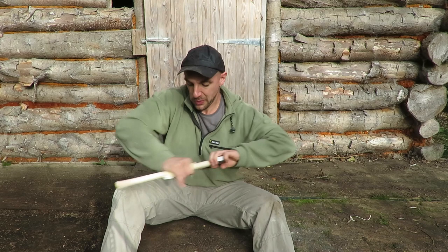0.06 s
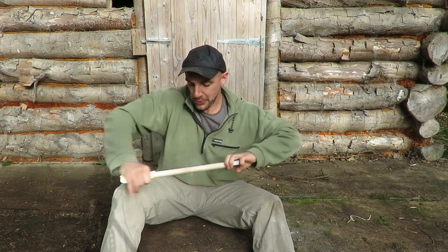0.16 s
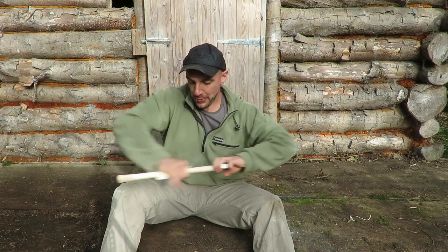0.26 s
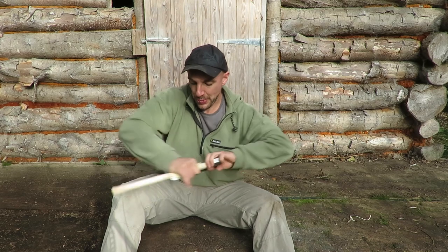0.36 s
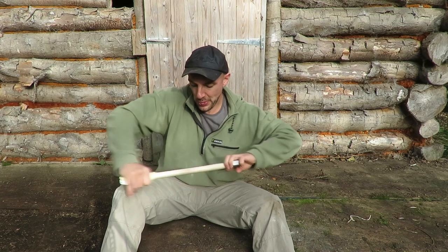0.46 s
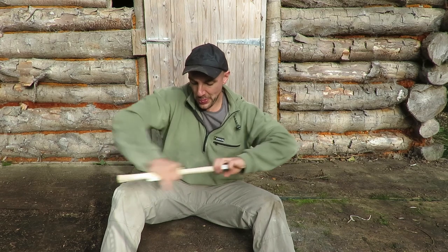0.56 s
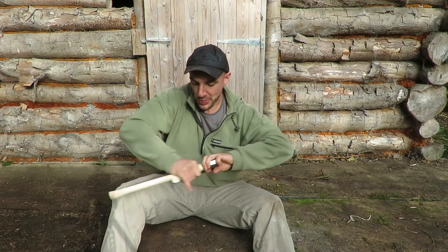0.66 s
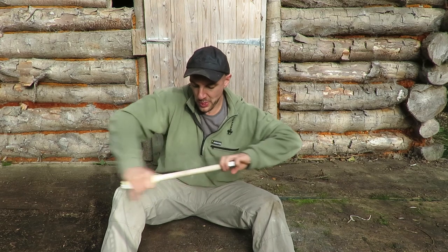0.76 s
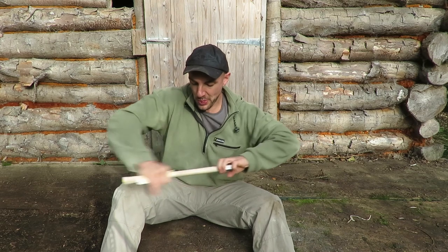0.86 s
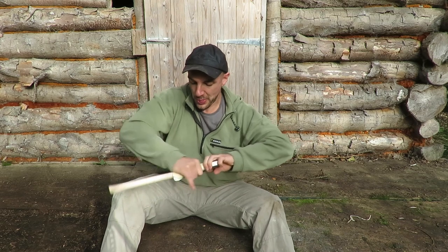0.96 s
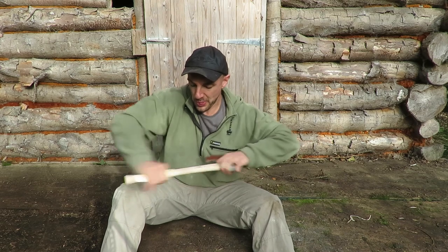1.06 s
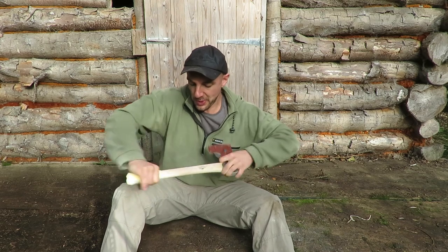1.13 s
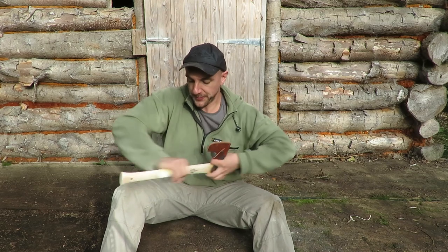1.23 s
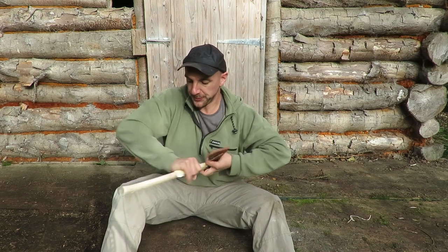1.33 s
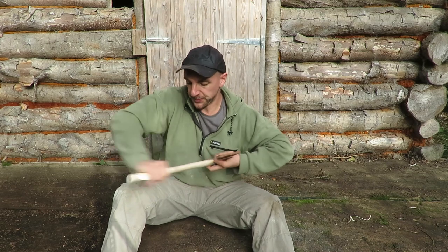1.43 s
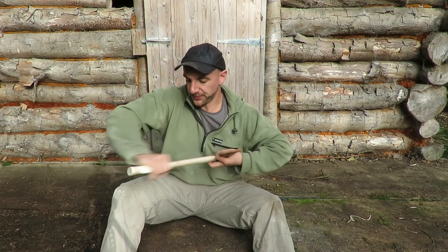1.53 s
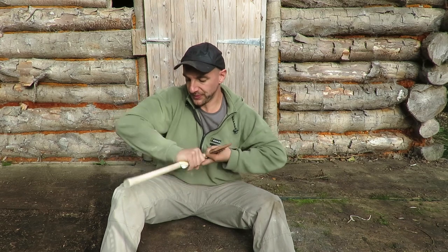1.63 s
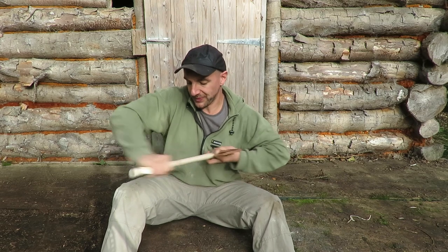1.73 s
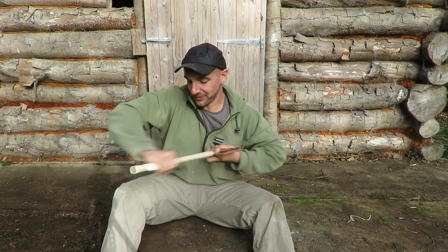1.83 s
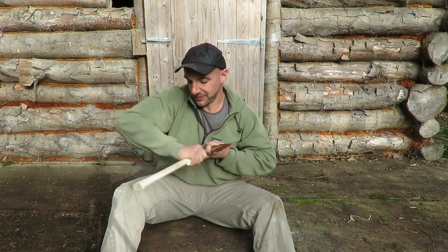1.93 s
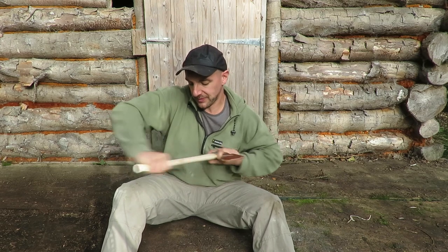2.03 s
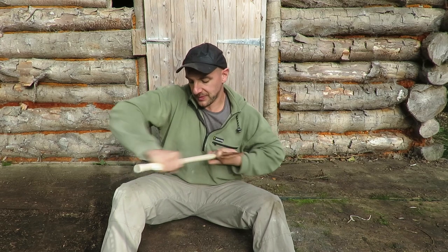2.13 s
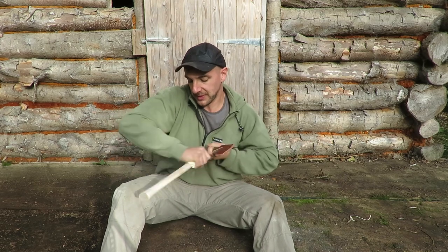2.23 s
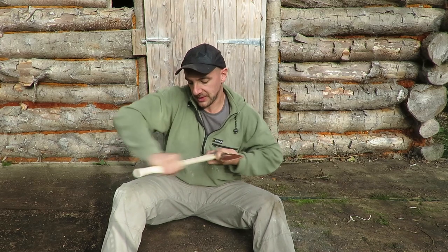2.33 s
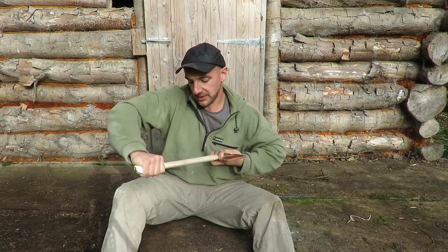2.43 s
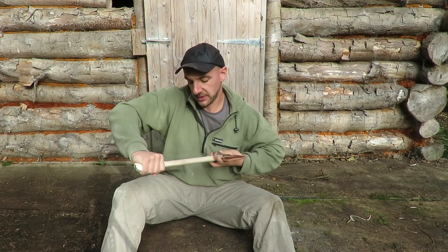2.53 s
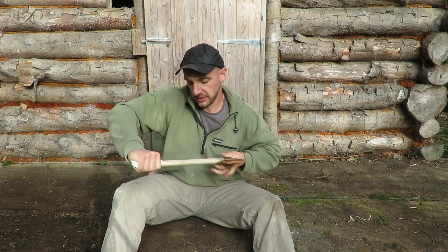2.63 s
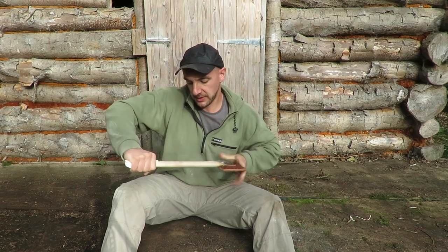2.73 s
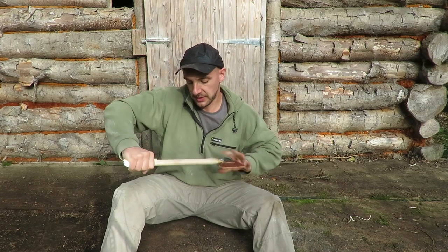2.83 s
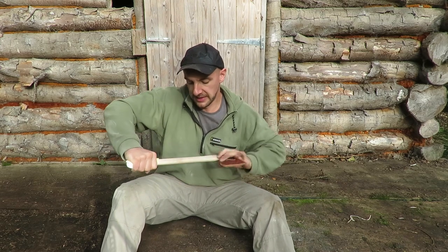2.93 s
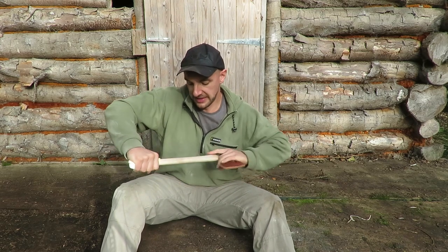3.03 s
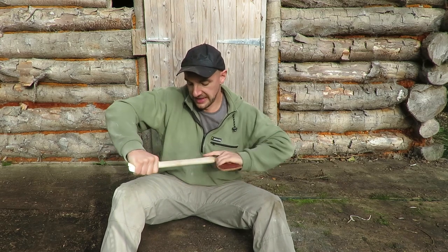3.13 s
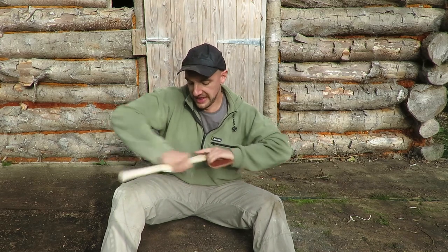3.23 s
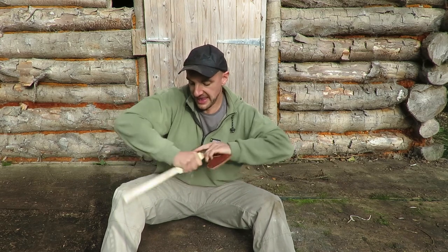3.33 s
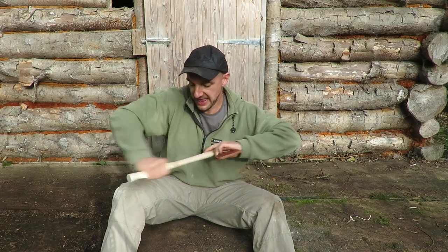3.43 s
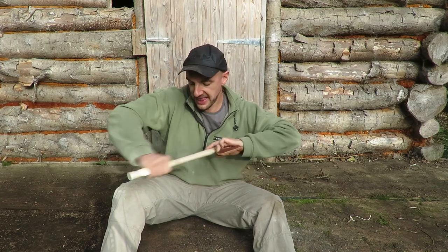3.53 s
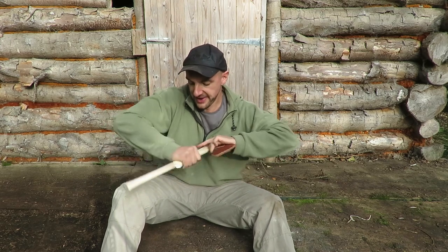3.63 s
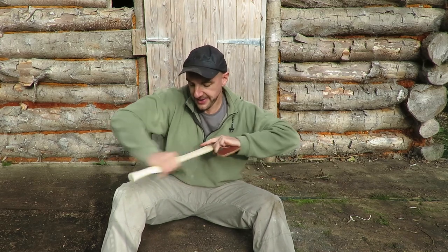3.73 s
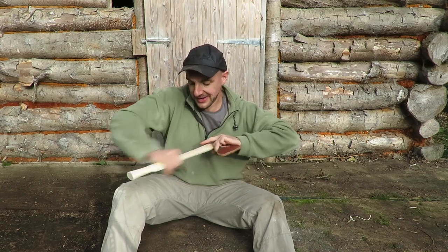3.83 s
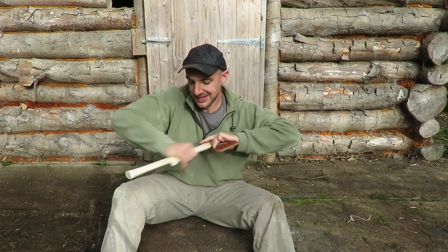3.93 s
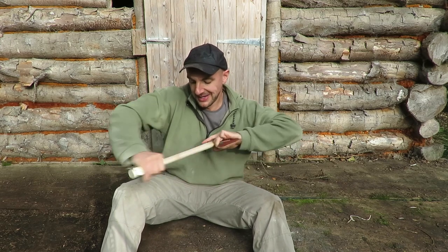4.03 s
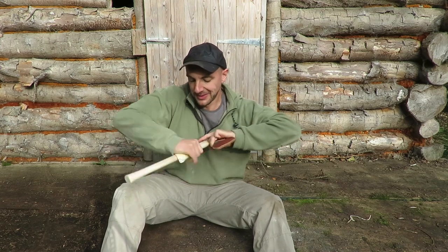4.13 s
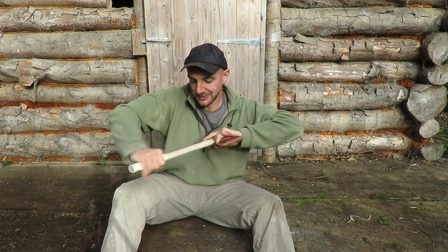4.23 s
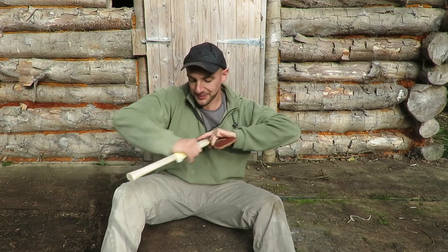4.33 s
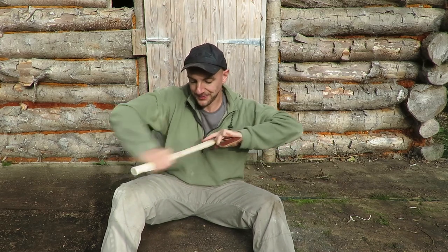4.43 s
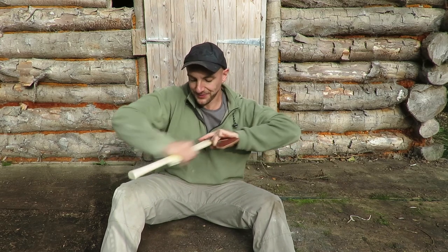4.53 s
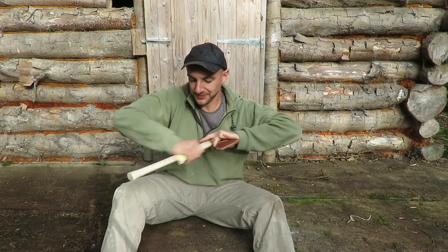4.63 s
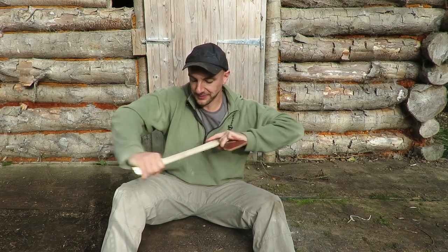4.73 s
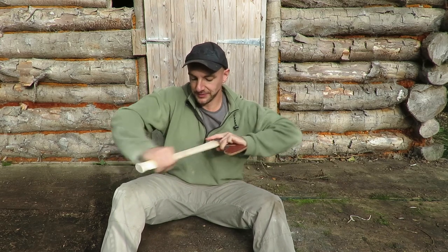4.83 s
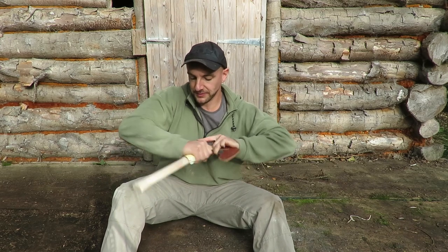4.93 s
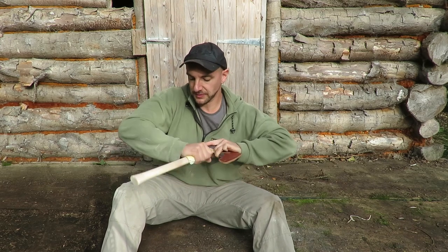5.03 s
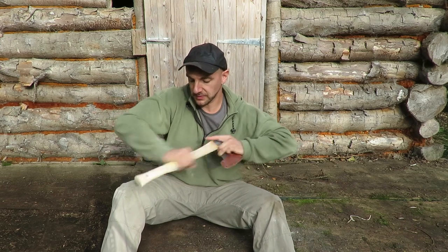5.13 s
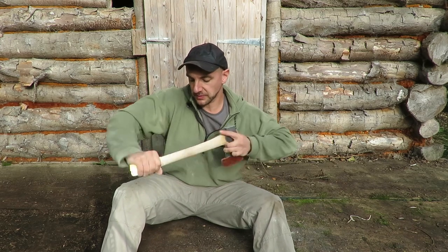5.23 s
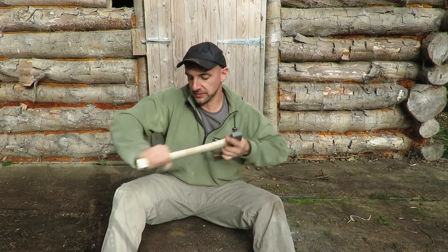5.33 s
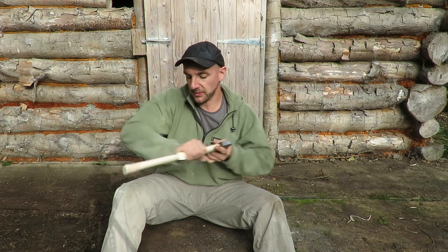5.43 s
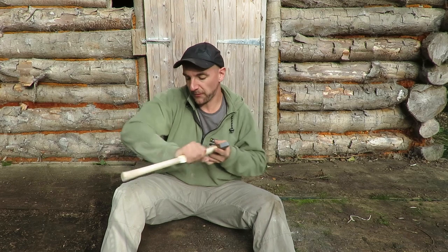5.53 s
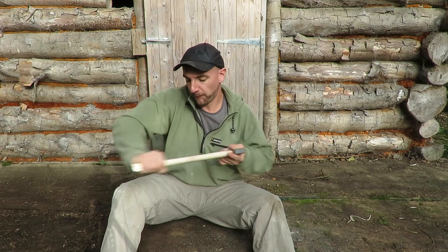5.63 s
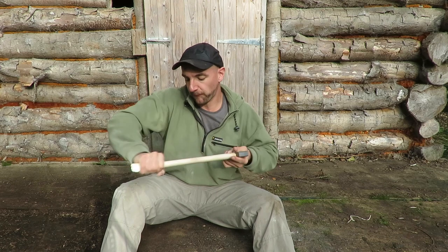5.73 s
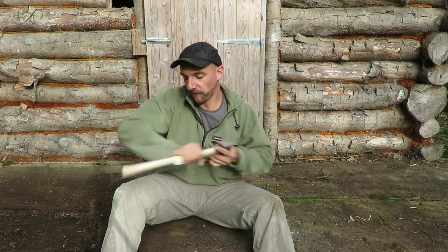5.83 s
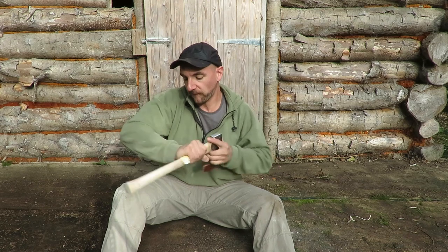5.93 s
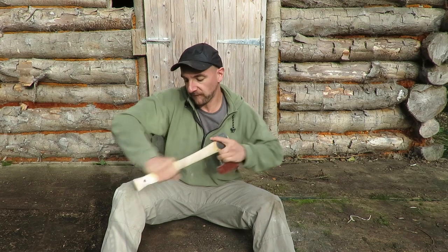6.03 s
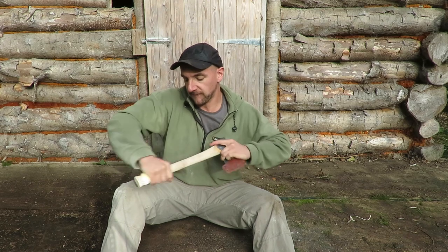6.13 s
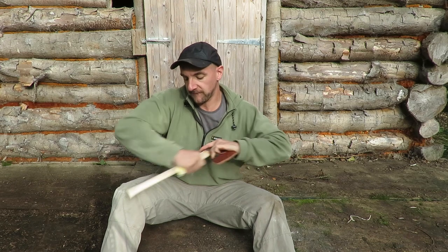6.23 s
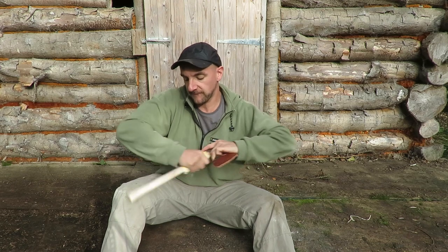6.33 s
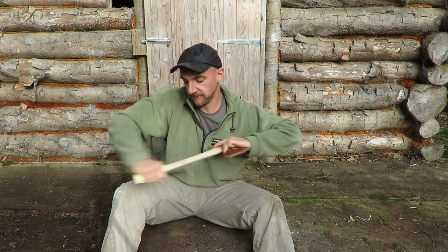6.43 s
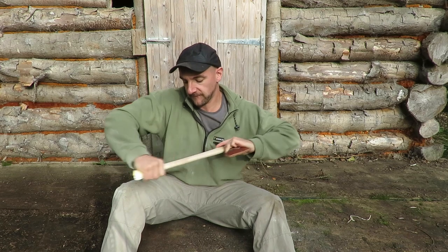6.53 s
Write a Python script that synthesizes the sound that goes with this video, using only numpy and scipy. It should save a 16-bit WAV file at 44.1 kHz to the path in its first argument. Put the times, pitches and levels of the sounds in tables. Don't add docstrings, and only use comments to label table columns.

```python
import sys
import numpy as np
from scipy import signal
from scipy.fft import rfft, irfft, next_fast_len
from scipy.io import wavfile
from scipy.ndimage import uniform_filter1d, map_coordinates

SR = 44100
rng = np.random.default_rng(int(sys.argv[2]) if len(sys.argv) > 2 else 0)


def ratio_of_db(decibels):
    return 10 ** (np.asarray(decibels, float) / 20)


def output_pcm(signal):
    pcm = np.clip(np.atleast_2d(signal).T, -1, 1) * 32767
    wavfile.write(sys.argv[1], SR, np.round(pcm).astype(np.int16))


N = 289825


def unit(x):
    return x / np.sqrt(np.mean(x ** 2) + 1e-20)


def along(points, hz):
    f, v = np.transpose(points)
    return np.interp(np.log(hz + 1), np.log(f + 1), v)


def wobble(rate):
    coarse = np.arange(0, N + 64, 64)
    knots = rng.standard_normal(int(N * rate / SR) + 4)
    return np.interp(np.arange(N), coarse, map_coordinates(knots, [coarse * rate / SR]))


def filtered(x, response):
    m = next_fast_len(N + 8192)
    return irfft(rfft(x, m) * response(np.fft.rfftfreq(m, 1 / SR)), m)[..., :N]


def coloured(x, spectrum):
    return filtered(x, lambda f: ratio_of_db(along(spectrum, f)))


def patchy(x, depth_db):
    z = signal.stft(x, nperseg=256)[2]
    field = uniform_filter1d(rng.standard_normal(z.shape), size=4, axis=0)
    field = uniform_filter1d(field, size=14, axis=1)
    return unit(signal.istft(z * ratio_of_db(depth_db * unit(field)), nperseg=256)[1][:N])


def grit(density, spread_db):
    hit = rng.random(N) < density
    return unit(hit * rng.standard_normal(N) * ratio_of_db(spread_db * rng.exponential(size=N)))


def rush():
    # frequency in Hz, level in dB per Hz.
    rush_spectrum = [(20, -20), (40, 5), (60, 4), (130, -4.5), (200, -5.5), (450, -9.5), (800, -7.5),
                     (1500, -12.5), (2200, -19.5), (4000, -23.5), (9000, -26.5), (15500, -32)]
    # frequency in Hz, side level in dB under the middle.
    side_width = [(60, -31), (200, -18), (400, -11.5), (1000, -19.5), (15000, -6.5)]
    # time in seconds, level in dB.
    traffic_swell = [(0, -47), (1.5, -50.5), (2.36, -45), (2.78, -50.5), (3.3, -45), (3.7, -47),
                     (4.1, -46.5), (4.65, -52), (5.29, -46), (5.67, -50.5), (6.57, -42)]
    s, db = np.transpose(traffic_swell)
    mid = patchy(coloured(rng.standard_normal(N), rush_spectrum), depth_db=1.45)
    side = unit(coloured(rng.standard_normal(N), rush_spectrum))
    side = coloured(side, side_width)
    swell_db = 0.67 * np.interp(np.arange(N) / SR, s, db - db.mean())
    return ratio_of_db(-40.5 + swell_db) * np.array([mid + side, mid - side])


def engine():
    # time in seconds, third order of the engine in Hz, level in dB.
    idle_speed = [
        (0.0, 54.2, -40),
        (0.07, 56.8, -40.5),
        (1.41, 58.9, -46),
        (2.36, 56.6, -44),
        (2.76, 58.5, -43.5),
        (4.76, 56.48, -43),
        (5.1, 58.6, -40),
        (5.29, 60.24, -44.5),
        (6.57, 59.9, -45),
    ]
    # multiple of the firing cycle, level in dB.
    orders = [(1, -43), (2, -13.5), (3, 2.5), (4, -8.5), (5, -13), (6, -22), (7, -6), (8, -16.5), (9, -15)]
    s, hz, db = np.transpose(idle_speed)
    t = np.arange(N) / SR
    turn = 2 * np.pi * np.cumsum(np.interp(t, s, hz) / 3) / SR
    tones = 0
    for k, level_db in orders:
        loudness = ratio_of_db(level_db + 2.1 * wobble(6.5))
        tones = tones + loudness * np.sin(k * turn + 1.22 * wobble(5))
    return np.sqrt(2) * ratio_of_db(np.interp(t, s, db) - 3.0) * tones


def wall(x):
    # frequency in Hz, time to fall 60 dB in seconds.
    decay_times = [(300, 0.16), (3000, 0.36), (12000, 0.32)]
    hz, t, z = signal.stft(rng.standard_normal(SR // 3), SR, nperseg=256)
    fade = ratio_of_db(-60 * t / along(decay_times, hz)[:, None])
    tail = signal.istft(z * fade, SR, nperseg=256)[1]
    return signal.oaconvolve(x, tail / np.linalg.norm(tail))[:N]


def rustle():
    # centre in seconds, spread in seconds, level in dB.
    shifts = [
        (2.62, .12, -63),
        (2.82, .06, -51),
        (3.08, .04, -46),
        (3.22, .07, -54),
        (4.89, 0.027, -41),
        (5.09, 0.0075, -43),
        (5.15, .025, -44.5),
        (6.398, 0.0092, -37),
    ]
    t = np.arange(N) / SR
    gain = sum(ratio_of_db(db) * np.exp(-((t - s) / spread) ** 2) for s, spread, db in shifts)
    spectrum = [(900, -6), (2500, -1.5), (9000, -10.0), (15500, -9)]  # (Hz, dB)
    crackle = coloured(grit(density=0.077, spread_db=-3.5), spectrum)
    return gain * ratio_of_db(2.0) * unit(crackle)


def knocks():
    # start in seconds, peak in dB, pitch in Hz, time to fall 60 dB in seconds.
    ticks = [(0.8295, -14, 5000, 0.0036), (1.289, -14, 3000, 0.0036), (2.3158, -12, 1920, 0.003),
             (2.7033, -31, 3140, 0.013), (2.7026, -41, 9500, 0.01), (2.8177, -35, 6700, 0.014),
             (2.8241, -35, 3800, .01), (3.0395, -36, 4300, .01), (2.8426, -42, 3400, .01),
             (3.04, -33.5, 2580, .025), (3.385, -17, 2230, .02), (4.3047, -7, 4970, 0.0094),
             (4.8351, -11, 2300, .012), (6.2699, -17, 5000, .004), (6.3432, -4, 4900, .008),
             (6.342, -10.5, 2020, 0.016)]
    # start in seconds, peak in dB, pitch in Hz, time to fall 60 dB and attack in seconds.
    bumps = [(1.2525, -6.5, 815, 0.0076, 0.00049), (1.2517, -16, 340, 0.012, .0005),
             (1.2543, -7, 1400, 0.016, .0005), (1.269, -18, 1700, 0.021, .001),
             (5.09, -27, 2300, 0.034, .005), (3.386, -22, 405, .08, .02), (3.405, -9.5, 352, 0.051, 0.028),
             (5.293, -18.5, 700, 0.014, .001), (5.305, -25.5, 433, 0.058, .008),
             (3.05, -40, 2500, .07, .006), (6.415, -18, 455, 0.015, .001)]
    out, t = np.zeros(N + SR), np.arange(SR // 8) / SR
    for s, db, hz, t60 in ticks:
        crack = 0.31 * rng.standard_normal(len(t))
        tick = ratio_of_db(db - 60 * t / t60) * (np.sin(2 * np.pi * hz * t) + crack)
        out[round(s * SR):][:len(t)] += tick
    for s, db, hz, t60, attack in bumps:
        onset = 1 - np.exp(-t / attack)
        out[round(s * SR):][:len(t)] += ratio_of_db(db - 60 * t / t60) * onset * np.sin(2 * np.pi * hz * t)
    return out[:N]


def strokes():
    # start and end in seconds, pressure at the start and at the end in dB,
    # wood ring over the hiss in dB.
    steady_bout = [(-0.028, 0.119, -24, -21.0, -13), (0.122, 0.278, -24.0, -19.5, -9.5),
                   (0.278, 0.441, -29, -21.0, -9.5), (0.44, 0.601, -25.5, -20.0, -7.5),
                   (0.597, 0.753, -25.5, -20.5, -8.5), (0.756, 0.911, -24.5, -19.5, -8),
                   (0.913, 1.073, -28, -22.0, -9.0), (1.072, 1.225, -27.5, -19.5, -7.5),
                   (1.234, 1.416, -18.5, -22, -8), (1.421, 1.592, -33.5, -20.5, -10),
                   (1.598, 1.748, -25.0, -21.5, -12), (1.753, 1.893, -24, -20.5, -11),
                   (1.888, 2.038, -27, -22.5, -11.5), (2.033, 2.183, -32.5, -19.0, -13.5),
                   (2.179, 2.335, -30, -22.0, -12), (2.327, 2.505, -33.5, -18.5, -14)]
    quick_bout = [(3.234, 3.409, -32.5, -21.0, -12), (3.418, 3.588, -30, -20, -11.5),
                  (3.593, 3.748, -28.5, -22.5, -12.5), (3.757, 3.899, -28, -19, -8.5),
                  (3.891, 4.013, -26.0, -19.5, -10.5), (4.017, 4.14, -26.5, -21.5, -10.5),
                  (4.133, 4.246, -25, -18.5, -10), (4.25, 4.365, -17.5, -23.0, -10.5),
                  (4.357, 4.471, -22.5, -22.5, -14.5), (4.467, 4.586, -28, -21.5, -10.0),
                  (4.58, 4.701, -22.5, -21, -11), (4.702, 4.869, -30.0, -20.5, -9.5),
                  (4.9, 5.068, -24.5, -21.5, -10.5)]
    slow_bout = [(5.16, 5.345, -30.5, -18.5, -6.5), (5.32, 5.579, -40.5, -22.0, -14),
                 (5.623, 5.781, -34, -17.5, -10), (5.826, 5.994, -26, -22.0, -13),
                 (6.001, 6.197, -35.5, -20, -5.5), (6.178, 6.394, -37.5, -23.0, -5.5),
                 (6.408, 6.582, -32, -19.5, -9)]
    return np.array([*steady_bout, *quick_bout, *slow_bout])


def per_stroke(values, places):
    start, end = strokes().T[:2, :, None]
    times = np.maximum.accumulate((start + (end - start) * np.array(places)).ravel())
    return np.interp(np.arange(N) / SR, times, values.ravel())


def direction():
    return (-1.) ** np.arange(len(strokes()))[:, None]


def sliding():
    speed_up_s, slow_down_s = 0.024, 0.021
    stick_s, break_free_s, creep = 0.01, 0.0027, 0.6
    build_curve, arch_db = 2.05, 4
    force = np.full(N, 1e-6)
    for start, end, first_db, last_db, _ in strokes():
        n = np.arange(max(int(start * SR) + 1, 0), min(int(end * SR), N))
        t = n / SR
        done = (t - start) / (end - start)
        speed = np.clip((t - start) / speed_up_s, 0, 1)
        speed *= np.clip((end - t) / slow_down_s, 0, 1) ** 1.34
        speed *= creep + (1 - creep) * np.clip((t - start - stick_s) / break_free_s, 0, 1)
        pressure_db = last_db + (first_db - last_db) * (1 - done) ** build_curve
        pressure_db += arch_db * 4 * done * (1 - done)
        force[n] += speed * ratio_of_db(pressure_db)
    return force


def grip():
    # time in seconds, favoured wood pitch in Hz, cupping in dB,
    # lowest modes left by the grip in dB.
    hand_path = [(0, 2150, 0, -9), (.6, 2220, -1, -4), (1.1, 1980, -1, -10), (1.3, 1860, 0.5, -4),
                 (1.65, 2350, 2, 6), (2.1, 2180, 0, 0), (2.4, 2000, -1.5, 1.5), (3.3, 1800, 1, -2),
                 (3.9, 2180, 0.5, 2), (4.3, 2280, 1, 4), (4.98, 2330, 0.5, -0.5), (5.2, 1500, 0, -3.5),
                 (5.33, 1470, 1.5, -5.5), (5.5, 1850, -3, -3), (5.9, 1550, -2, 2.5), (6.12, 1570, 2, -4.5),
                 (6.3, 1850, -1.5, 3.5), (6.57, 2000, -1.5, 4)]
    s, wood_hz, cup_db, free_db = np.transpose(hand_path)
    t = np.arange(N) / SR
    cupping_db = np.interp(t, s, cup_db) - 0.3 * per_stroke(direction(), [.5])
    return np.interp(t, s, wood_hz), cupping_db, np.interp(t, s, free_db)


def resonate(x, hz, width):
    b, a = signal.iirpeak(hz, hz / (1.46 * width), SR)
    return unit(signal.lfilter(b, a, signal.lfilter(b, a, x)))


def modes(rub, table, favoured_hz, narrow_db, swell_db, loose_db):
    ring, total = 0, 1e-9
    for hz, width, db in table:
        off_pitch_db = narrow_db * np.log(hz / favoured_hz) ** 2
        freed_db = loose_db * np.clip((1700 - hz) / 400, 0, 1)
        share = ratio_of_db(db + swell_db * wobble(14) - off_pitch_db + freed_db)
        ring = ring + share * resonate(rub, hz, width)
        total = total + share ** 2
    return ring / np.sqrt(total)


def grain_hiss(pace):
    # frequency in Hz, level in dB per Hz.
    grain_spectrum = [(500, -25.5), (1000, -16), (1450, -12.5), (1900, -7), (3200, -6), (3700, -4),
                      (4300, -3), (6300, -2.5), (8000, -2.5), (15500, -14)]
    hiss = patchy(coloured(grit(density=.6, spread_db=-0.1), grain_spectrum), depth_db=2.0)
    dull = uniform_filter1d(hiss, size=5)
    return dull + np.clip(3 * pace, 0, 1) ** 0.23 * (hiss - dull)


def fine_hiss():
    # frequency in Hz, level in dB per Hz.
    fine_spectrum = [(5500, -26.5), (7500, -3.5), (9000, -1.5), (11500, -1.5), (13700, -4.5), (15500, -14)]
    return patchy(coloured(grit(density=.6, spread_db=0.0), fine_spectrum), depth_db=2.1)


def handle_ring(hand_hz, free_db):
    # frequency in Hz, width in Hz, level in dB.
    bending_modes = [(864, 47, -5), (1165, 53, -17), (1302, 320, -2.5), (1491, 156, -2.5), (1625, 134, -2),
                     (1763, 174, 1.5), (1913, 104, -5), (2100, 360, 5), (2396, 197, 0), (2726, 233, 4.5),
                     (2926, 146, 0.5), (3090, 230, -2)]
    # centre in seconds, spread in seconds,
    # lowest modes freed in dB, all modes lifted in dB.
    slack_moments = [(.095, 0.029, 7, 9.5), (0.251, 0.012, 15.5, 6), (.4, 0.036, -1, 5),
                     (.575, 0.017, 14, 5), (.88, .025, 13, 3), (1.2, .02, 7.5, 5), (1.29, 0.048, -7, 7.5),
                     (1.57, 0.013, 11, 3.5), (1.9, 0.036, 12.5, 1.5), (2.15, 0.023, 8, 5),
                     (2.47, 0.02, 5.5, 6.5), (3.27, 0.027, 9, -1.5), (3.84, 0.038, 3, -1),
                     (4.56, 0.018, -3, 6.5), (4.83, .03, 11.5, 2), (4.93, .02, 4, 5),
                     (5.04, 0.016, 11, 6.5), (5.25, 0.024, -5, 8.5), (5.32, 0.049, -3, 7.5),
                     (5.41, 0.037, 3.5, 12), (5.72, 0.047, 9.5, 1.5), (6.12, 0.046, -0.5, 6.5),
                     (6.25, 0.033, 1, 5)]
    t = np.arange(N) / SR
    loose_db, lift_db = sum(np.outer(db, np.exp(-((t - at) / spread) ** 2))
                            for at, spread, *db in slack_moments)
    ring_db = 1.02 * (strokes()[:, 4:] + 10) + [9, 0, 5]
    wood_db = per_stroke(ring_db, [.25, .5, .8]) + lift_db
    sweep = 0.052 * per_stroke(direction() * [-1, 1], [.3, .7])
    wood = modes(grit(density=.25, spread_db=1.05), bending_modes, hand_hz * (1 + sweep),
                 narrow_db=32.5, swell_db=1.94, loose_db=loose_db + free_db)
    return ratio_of_db(wood_db - 12) * wood


def hand_hollow():
    # frequency in Hz, width in Hz, level in dB.
    hollow_modes = [(4263, 330, -5.5), (4630, 770, -0.5), (5200, 600, -3), (5830, 1150, -6.5)]
    hollow_hz = 4850 * (1 + 0.053 * per_stroke(direction(), [.5]))
    return modes(grit(density=0.28, spread_db=-0.9), hollow_modes, hollow_hz,
                 narrow_db=123, swell_db=2.5, loose_db=0)


def sanding():
    force = sliding() * ratio_of_db(0.7 * wobble(45) + 0.2 * wobble(26))
    pace = force / force.max()
    hand_hz, cupping_db, free_db = grip()
    slow, fast = np.clip(pace ** -.12, 0, 3), pace ** 0.72
    hiss = ratio_of_db(-3.0) * grain_hiss(pace)
    fine = ratio_of_db(-0.48 * cupping_db - 0.5) * fast * fine_hiss()
    wood = slow * handle_ring(hand_hz, free_db)
    cup = ratio_of_db(cupping_db - 7) * hand_hollow()
    return force * (hiss + fine + wood + cup)


def scene():
    near = sanding() + knocks() + rustle()
    return near + ratio_of_db(-20.5) * wall(near) + engine() + rush()


def low_pass(x):
    return signal.sosfilt(signal.butter(12, 15980, fs=SR, output="sos"), x)


def record(dry):
    level = np.sqrt(np.abs(uniform_filter1d(dry[0] ** 2, size=441)))
    gain = uniform_filter1d(np.clip(level / ratio_of_db(-16.0), 1, None) ** -.4, size=441)
    held = dry * gain
    held = held / (1 + np.abs(held / .95) ** 6) ** (1 / 6)
    top_hz = 15850
    return low_pass(filtered(held, lambda f: f < top_hz))


dry = scene()
out = record(dry)
output_pcm(out)
```